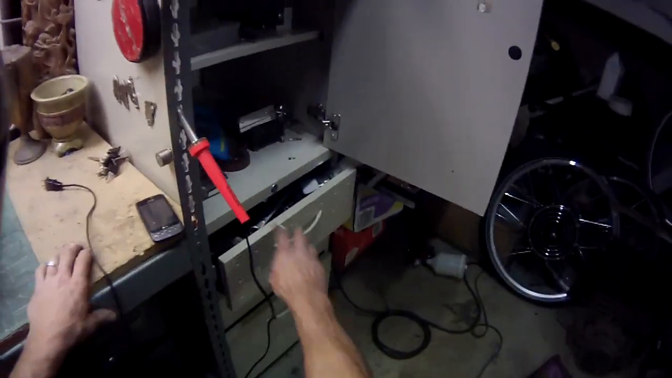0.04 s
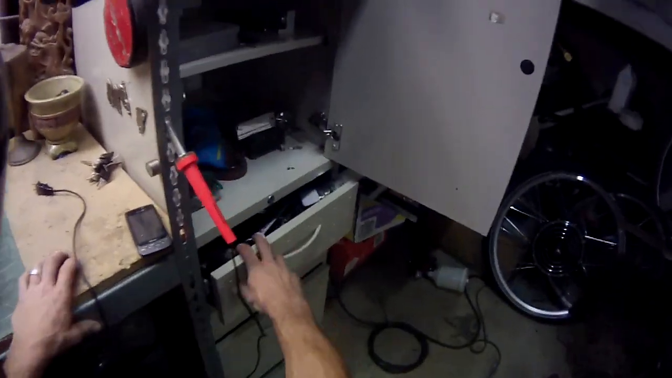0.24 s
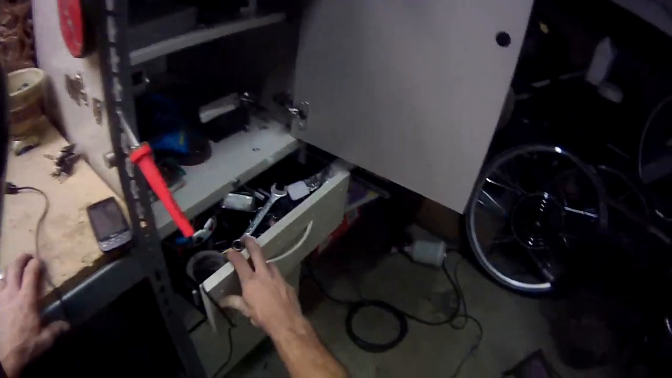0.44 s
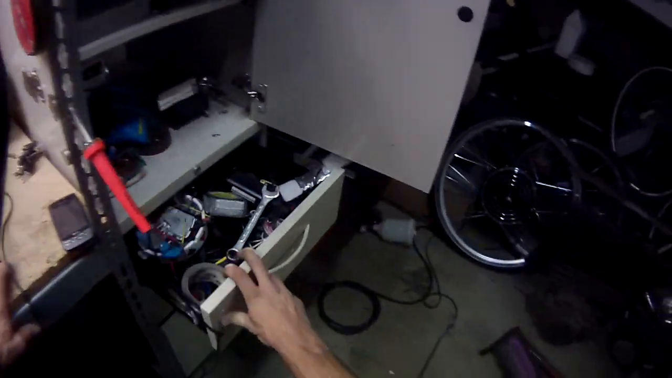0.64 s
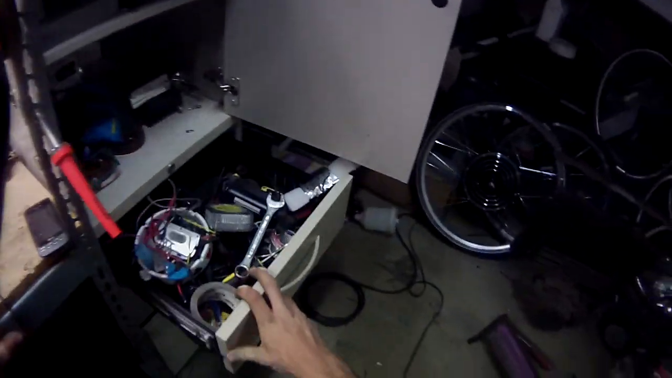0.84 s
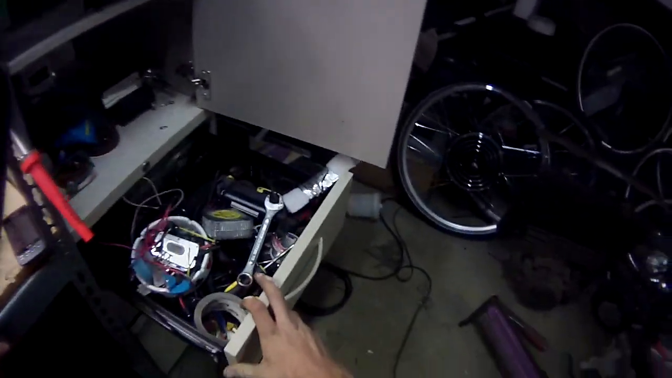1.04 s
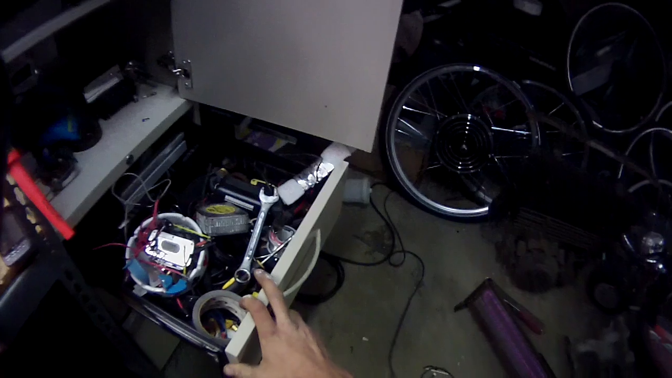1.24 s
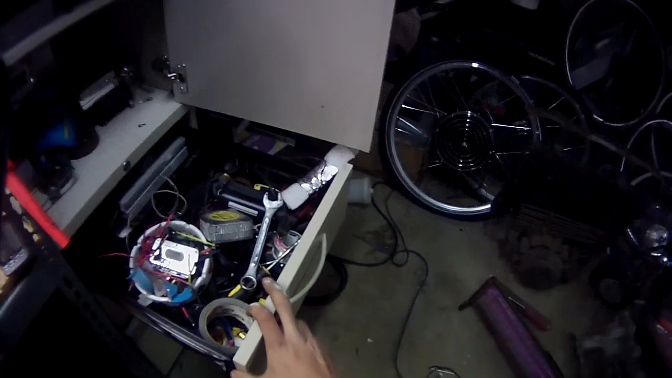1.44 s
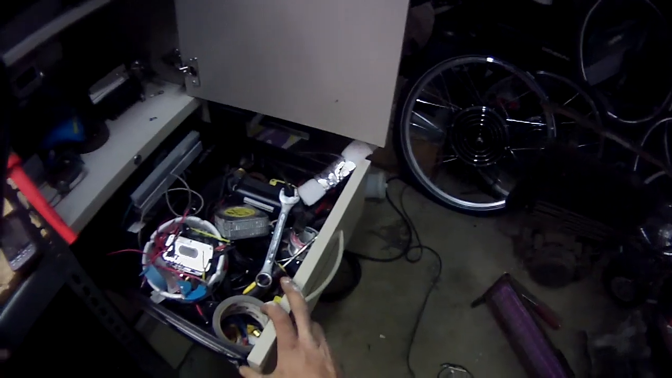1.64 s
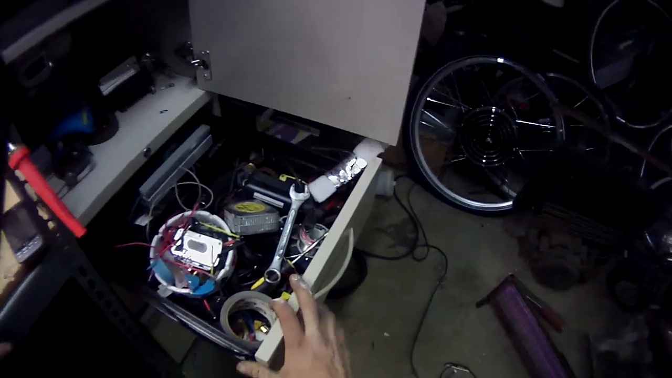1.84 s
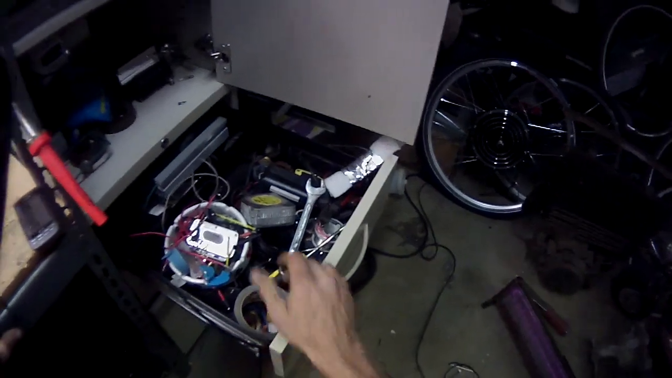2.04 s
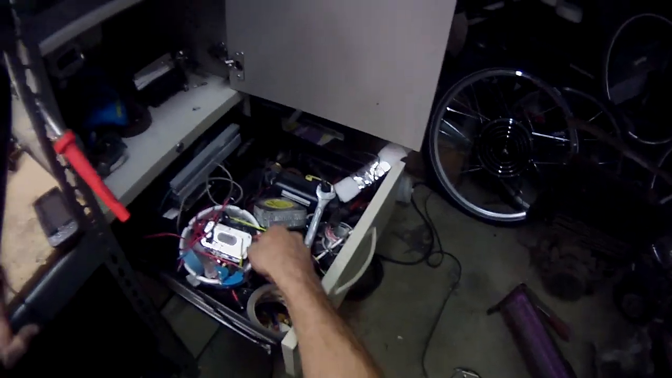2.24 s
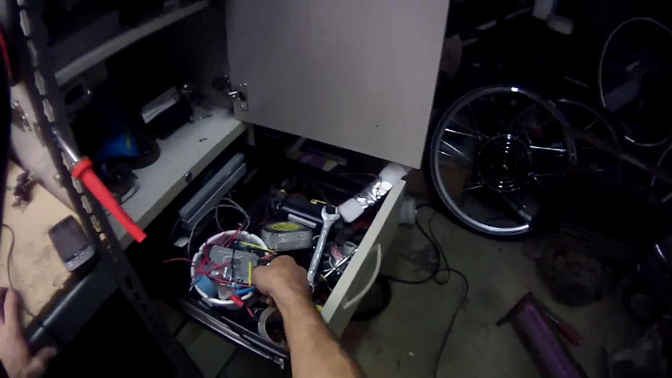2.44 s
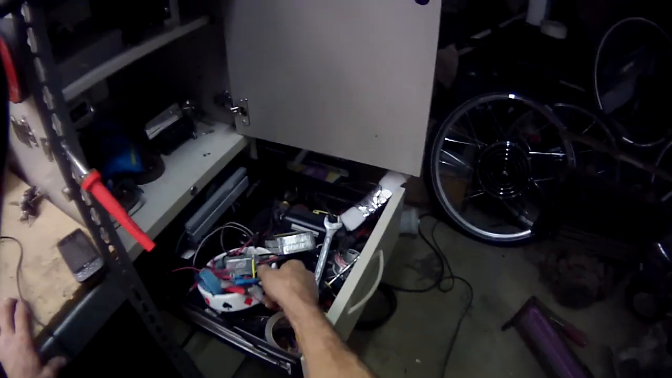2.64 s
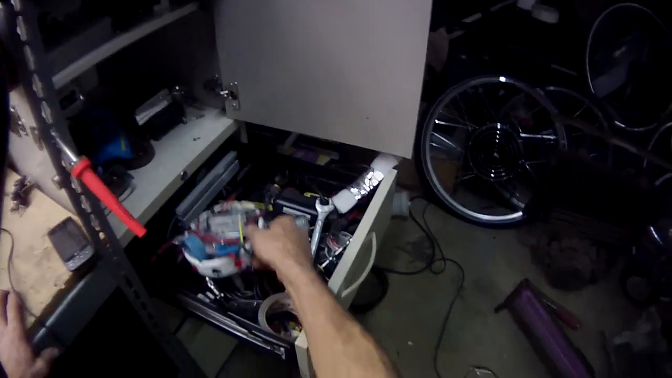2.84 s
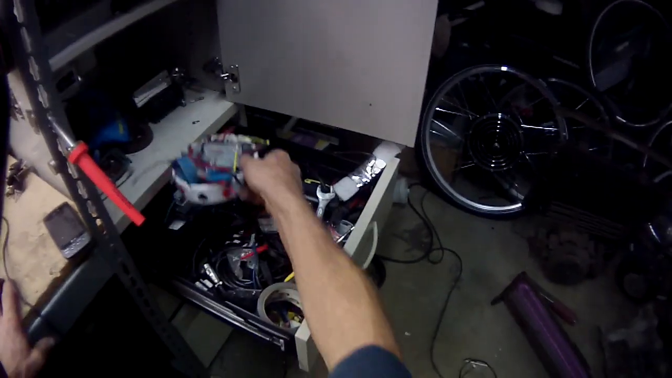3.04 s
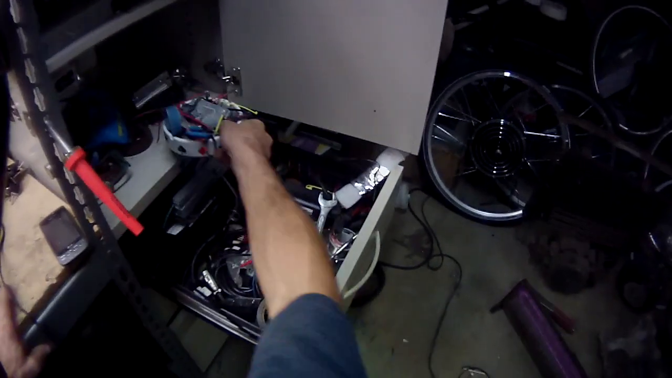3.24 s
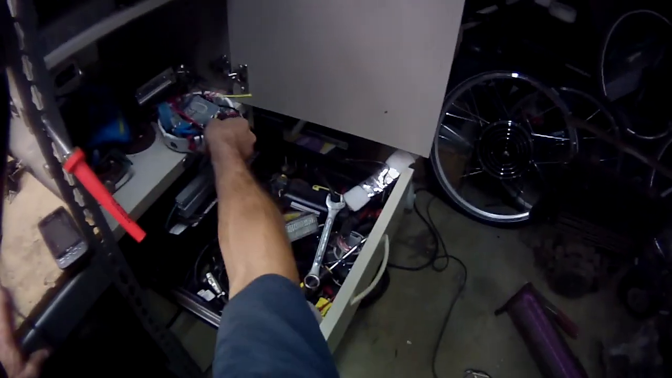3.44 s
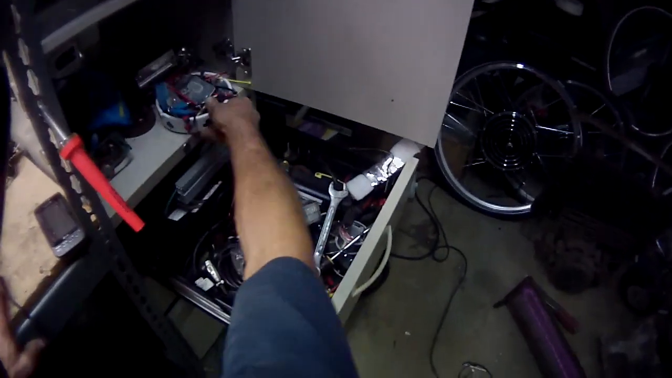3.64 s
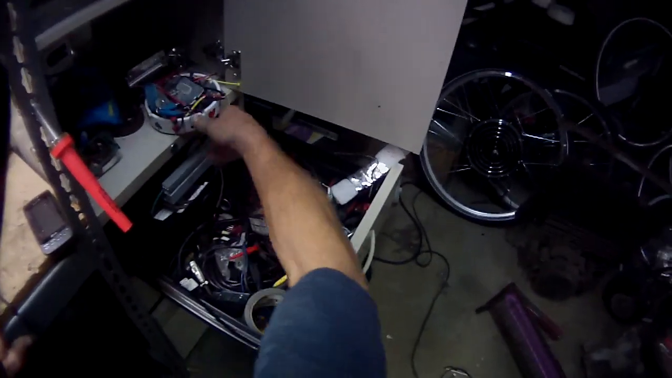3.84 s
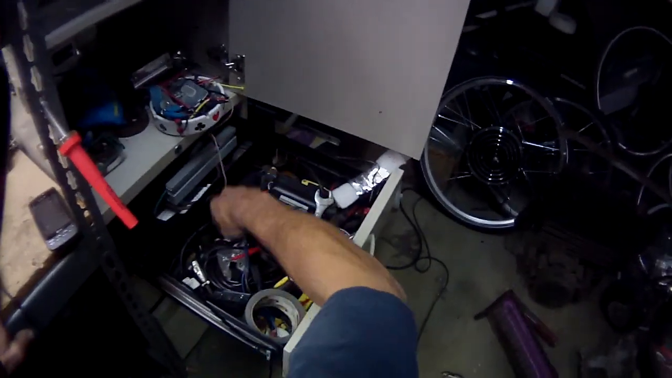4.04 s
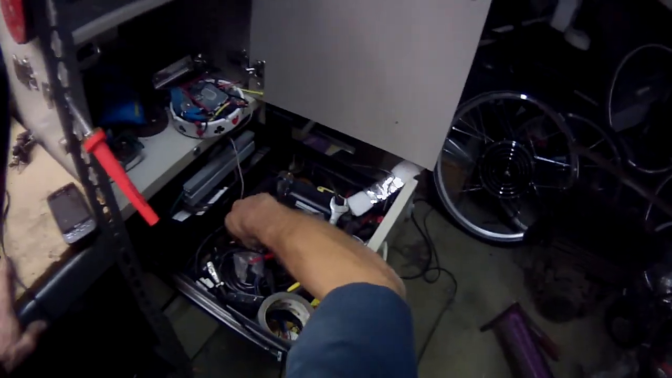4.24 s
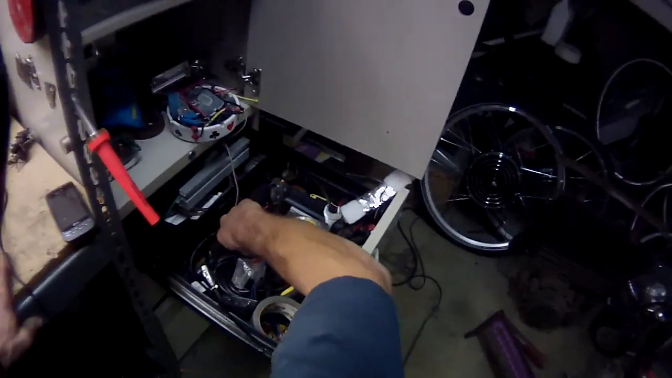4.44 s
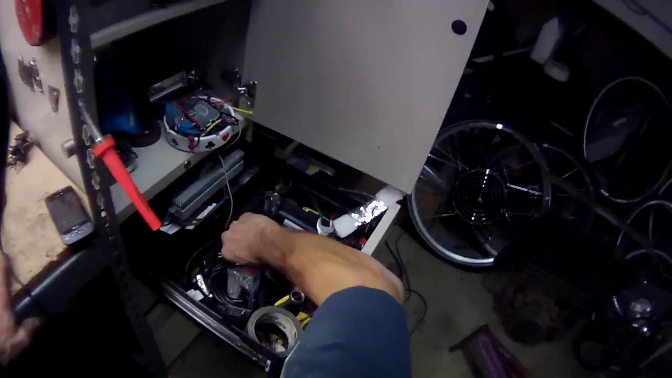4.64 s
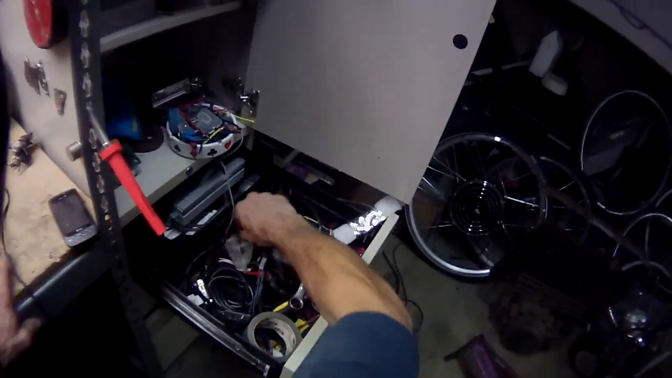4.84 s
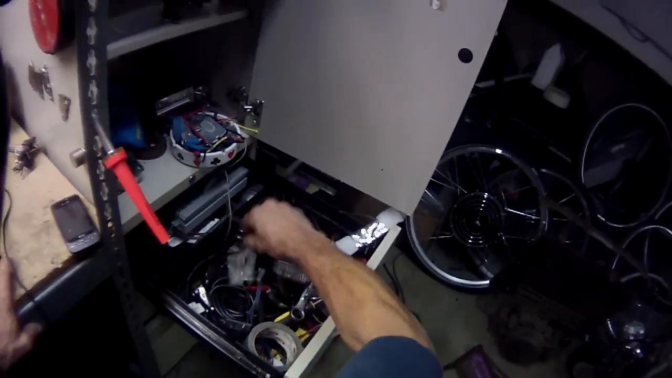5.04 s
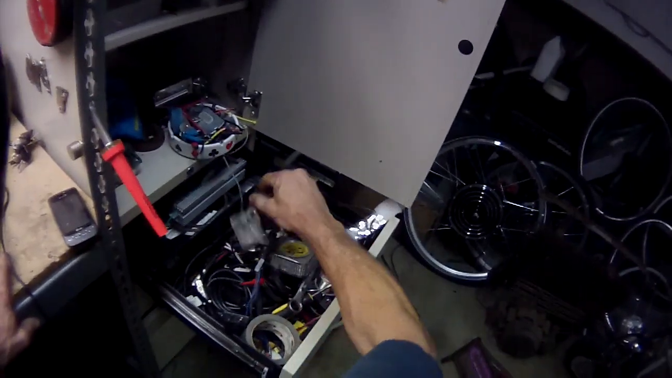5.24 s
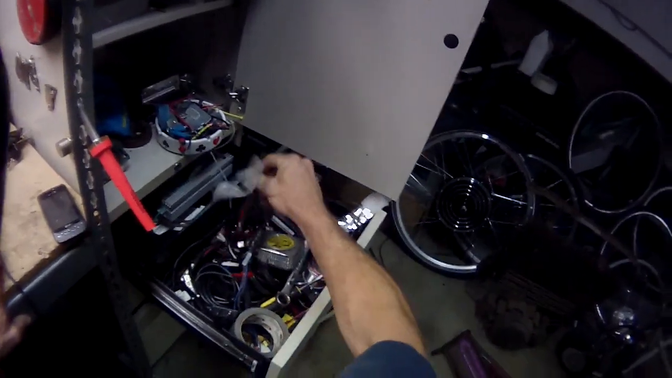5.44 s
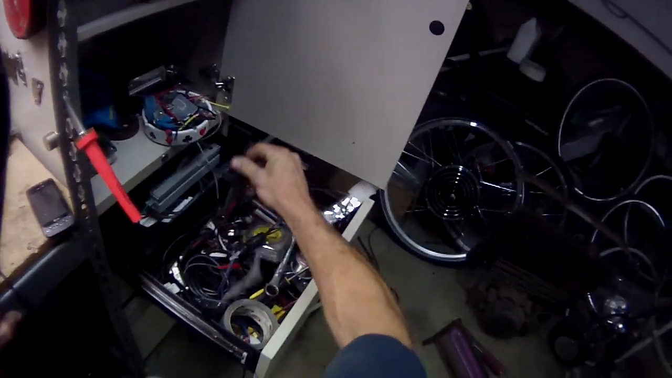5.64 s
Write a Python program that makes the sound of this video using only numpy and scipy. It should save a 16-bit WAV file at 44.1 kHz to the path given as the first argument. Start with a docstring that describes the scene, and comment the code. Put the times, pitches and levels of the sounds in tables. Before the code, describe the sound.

A wooden drawer scrapes open, then a hand rummages through tools and wires with light clinks, clatters, knocks and soft low thuds.

```python
"""A wooden drawer of tools and wires scrapes open in a small workshop; the tools bump, shift and clink.
A hand lifts out a round plastic-cased gadget, sets it on the shelf above, then digs among the wires again,
knocking loose parts together. Knocks and clinks are fading sine waves and noise; rubbing is many tiny puffs
of noise. Short room echoes surround them, over a low rumble and smooth hiss."""
import sys
import numpy as np
from scipy import signal
from scipy.fft import rfft, irfft
from scipy.io import wavfile
from scipy.ndimage import uniform_filter1d

SR = 44100
rng = np.random.default_rng(int(sys.argv[2]) if len(sys.argv) > 2 else 0)


def int16_out(signal):
    """Quantize to a 16-bit WAV file."""
    q = np.round(np.clip(np.atleast_2d(signal).T, -1, 1) * 32767)
    wavfile.write(sys.argv[1], SR, q.astype(np.int16))


N = 251370  # length of the scene in samples
RING_T = np.arange(SR // 2) / SR  # half a second of time since a contact, in seconds

# Tone of small parts touching. Each row: frequency in Hz, relative gain in dB.
CLINK_COLOUR = [(200, -20), (900, -21), (1300, -2.5), (2200, 5.5), (3200, 5), (4300, 7.5), (5800, 2.5),
                (6700, -10.5), (7800, -19), (15000, -70)]
# Tone of the drawer's wood. Each row: frequency in Hz, relative gain in dB.
WOOD_COLOUR = [(60, -25), (130, -0.5), (200, -4.5), (300, -2), (450, -1.5), (640, -2.5), (780, -16),
               (1200, -28), (4000, -50.5)]
# Bumps that knock the panels and set the contents clattering. Each row: start in seconds,
# level of the first knock in dB, pitch factor, clatter level in dB, settling time in seconds.
BUMPS = [(0.372, -34.5, 0.92, -39, 0.014), (0.648, -49, 0.95, -52.5, 0.014), (2.55, -56, 1.04, -64, 0.016),
         (2.598, -55, 0.96, -45, 0.019), (2.715, -53, 1.1, -47.5, 0.031), (2.808, -53, 1.12, -49.5, 0.0051),
         (3.398, -33.5, 0.94, -30, 0.017), (3.452, -38, 0.97, -35, 0.011), (3.551, -39.5, 1.09, -36, 0.016),
         (3.611, -58, 1.2, -48, 0.028), (4.3562, -42.5, 1.17, -48, 0.017), (5.159, -49, 1.1, -40.5, 0.026),
         (5.211, -51, 0.86, -38.5, 0.03), (5.2801, -25, 1.0, -25, 0.015), (5.524, -72, 0.76, -47.5, 0.01),
         (5.609, -47.5, 1.19, -57, 0.015)]
# A hard plastic part snapping down and bouncing. Each row: start in seconds, level of its ring in dB.
SNAPS = [(4.3564, -32), (4.3607, -31), (4.37, -46)]


def undb(db):
    """Turn decibels into a plain multiplying gain."""
    return 10 ** (np.asarray(db) / 20)


def level(x, db):
    """Set the average (rms) strength of a lasting sound."""
    return x * undb(db) / np.std(x)


def hit_level(x, db):
    """Set a blow's energy to that of a 10 ms sound at the given level."""
    energy = np.sum(x ** 2)
    return x * undb(db) / np.sqrt(energy / (SR * .01))


def add(out, s, x):
    """Mix x into out from time s on, cutting whatever runs past the end."""
    i = max(int(s * SR), 0)
    out[i:i + len(x)] += x[:max(len(out) - i, 0)]


def colour(x, points, size=8192):
    """Shape the tone through points of Hz and dB, with a filter that never sounds ahead of its input."""
    hz, db = np.transpose(points)
    bins_hz = np.arange(size // 2 + 1) * SR / size
    gain_db = np.interp(np.log(bins_hz + 1), np.log(hz), db)
    # folding the cepstrum to one side gives the quickest response with these gains
    cepstrum = irfft(np.log(undb(gain_db)))[:size // 2]
    cepstrum[1:] *= 2
    response = irfft(np.exp(rfft(cepstrum, size)))
    return signal.fftconvolve(x, response)[:len(x)]


def fade(t60):
    """Die away steadily, by 60 dB in t60 seconds."""
    return np.exp(-np.log(1000) * RING_T / max(t60, 1e-3))


def burst(t60):
    """Fading noise, standing for countless weak vibrations that die together."""
    return rng.standard_normal(len(RING_T)) * fade(t60)


def ring(modes, pitch=1):
    """Add fading sine waves from rows of Hz, dB and t60; every other one starts in the opposite direction."""
    total = 0
    for k, (hz, db, t60) in enumerate(modes):
        wave = np.sin(2 * np.pi * hz * pitch * RING_T)
        total = total + (-1) ** k * undb(db) * fade(t60) * wave
    return total


def grains(rate, uneven_db, t60, n):
    """Tiny random contacts of uneven size, each a fresh puff of noise; rate is contacts per second."""
    sizes = undb(uneven_db * np.minimum(rng.exponential(size=n), 3))
    contacts = sizes * (rng.random(n) < rate / SR)
    power = signal.fftconvolve(contacts ** 2, fade(t60) ** 2)[:n]
    return np.sqrt(np.abs(power)) * rng.standard_normal(n)


def walk(rate):
    """A smoothly drifting random value with a spread of 1, given rate new targets per second."""
    k = int(SR / rate)
    held = np.repeat(rng.standard_normal(N // k + 1), k)
    return level(uniform_filter1d(held, k)[:N], 0)


def own_peaks(count, patchy_db):
    """Give one part its own random peaks and hollows, as rows of Hz and dB."""
    return np.column_stack([np.geomspace(1200, 9000, count), patchy_db * rng.standard_normal(count)])


def clink(hz, t60, tick_db=-7, partials_db=-6, main_db=-9, bounce_db=-7, patchy_db=3, count=26):
    """One small part: a tick, a dense crack, a quick bounce, its main ring and many unrelated higher tones."""
    partials_hz = rng.uniform(1705, 6900, count)
    partials = zip(partials_hz, 3 * rng.standard_normal(count), t60 * (1 + rng.random(count)))
    crack = hit_level(burst(t60), 0) + hit_level(burst(0.0013), tick_db)
    bounce_s = rng.uniform(0.00207, 0.016)
    add(crack, bounce_s, hit_level(burst(0.1), bounce_db))
    tone = hit_level(ring(partials), partials_db)
    tone += hit_level(ring([(hz, 0, t60)]), main_db)
    return colour(colour(crack, own_peaks(count, patchy_db)) + tone, CLINK_COLOUR)


def tools(wood_t60=0.19, sparkle_sustain=1.25):
    """Each contact rings the part, sparkles on top and taps the wood that it lies on."""
    # Tools and small parts touching. Each row: start in seconds, level of the part in dB,
    # main ring in Hz, sparkle in dB relative to that level.
    contacts = [(0.366, -44, 3900, -28), (0.5517, -50.5, 1910, -32), (0.577, -47, 5800, -6.5),
                (0.7855, -54, 2390, -8.5), (0.8842, -43.5, 5340, -6.5), (0.936, -45, 3546, -7.5),
                (0.9635, -57, 3200, -5), (1.035, -53, 3380, -13), (1.0957, -54, 3940, -32),
                (1.19, -54, 2700, -34), (2.358, -50.5, 2820, -6), (2.409, -49, 4380, -13),
                (2.4273, -53, 5100, -3.5), (2.6589, -56.5, 4300, -6), (2.71, -48, 3830, -25),
                (2.772, -51.5, 3540, -12), (2.8052, -43.5, 4000, -12.5), (2.9093, -48, 4700, -8.5),
                (3.219, -41, 4240, -6), (3.3004, -52, 5400, -13), (3.3505, -49.5, 4600, -11),
                (3.4476, -38.5, 2500, -19), (3.5458, -38.5, 4370, -20), (4.1157, -46, 4280, -15),
                (4.2138, -47.5, 4010, -12.5), (4.2816, -49, 4000, -27), (4.583, -47.5, 4400, -19),
                (4.6218, -49.5, 3960, -9), (4.6511, -52, 4300, -27), (4.7567, -51, 4010, -13),
                (4.862, -58.5, 4000, -6), (4.9244, -52, 3700, -28), (5.031, -51.5, 4010, -17),
                (5.1083, -49, 2960, -19), (5.1278, -40.5, 2490, -12.5), (5.3562, -40, 3820, -18),
                (5.4934, -54.5, 5150, -7), (5.5418, -39, 4310, -18), (5.601, -38, 3950, -8.5),
                (5.667, -51, 3830, -6), (5.6924, -41, 4100, -11)]
    # Tone of the sparkle. Each row: frequency in Hz, relative gain in dB.
    sparkle_colour = [(3000, -73), (6000, 18.5), (7500, 7), (9300, 9), (11000, 1.5), (15000, -4)]
    # loose parts ring freely until the hand digs in among them and damps them
    free_t60_s, damped_t60_s, hand_in_s = 0.065, 0.048, 3.6
    # a middling part taps the wood this far below its own level; lower, heavier parts tap harder
    middling_hz, middling_tap_db, tap_db_per_octave = 4000, -11.5, 10
    out = np.zeros(N)
    for s, db, hz, bright_db in contacts:
        t60 = free_t60_s if s < hand_in_s else damped_t60_s
        sparkle = colour(burst(sparkle_sustain * t60), sparkle_colour)
        wood = colour(burst(wood_t60), WOOD_COLOUR)
        tap_db = middling_tap_db + tap_db_per_octave * np.log2(middling_hz / hz)
        add(out, s, hit_level(clink(hz, t60), db))
        add(out, s, hit_level(sparkle, db + bright_db))
        add(out, s, hit_level(wood, db + tap_db))
    return out


def knocks(count=3):
    """Hollow knocks on the drawer's panels, each rebounding ever weaker and a little higher."""
    # The drawer's panels. Each row: frequency in Hz before the pitch factor, relative level in dB,
    # time to fade by 60 dB in seconds.
    panel_modes = [(118, -19, .15), (230, -12, .08), (283, -11, .07), (344, -4, .09), (446, 0, .09),
                   (520, -6, .07), (653, -4, .09)]
    rebound_s, rebound_db, rebound_rise = 0.0112, -5, 0.076  # rise is a fraction of the first pitch
    out = np.zeros(N)
    for s, db, pitch, _, _ in BUMPS:
        for k in range(count):
            knock = ring(panel_modes, pitch * (1 + k * rebound_rise))
            add(out, s + k * rebound_s, hit_level(knock, db + k * rebound_db))
    return out


def clatters(contacts_per_s=1100, uneven_db=4, contact_t60=0.064, lag_s=0.005):
    """Just after a bump many edges of the contents strike close together, ever more weakly."""
    # Tone of the clatter. Each row: frequency in Hz, relative gain in dB.
    clatter_colour = [(300, -0.5), (600, 10), (800, -6.5), (1050, -4.5), (1350, -4), (2400, 1.5),
                      (3300, -3), (4400, -0.5), (5800, -4), (7300, -20.5), (9300, -21.5), (15000, -29)]
    out = np.zeros(N)
    for s, _, _, db, settle_s in BUMPS:
        run = grains(contacts_per_s, uneven_db, contact_t60, len(RING_T))
        run = run * np.exp(-RING_T / settle_s)
        add(out, s + lag_s, hit_level(colour(run, clatter_colour), db))
    return out


def clanks():
    """A loose metal part clanks against the tools, ringing in many close tones."""
    # Each row: start in seconds, level in dB.
    strikes = [(5.289, -35), (5.2932, -37)]
    # Ring of the metal. Each row: frequency in Hz, relative level in dB, time to fade by 60 dB in seconds.
    metal_modes = [(1280, 0, 0.055), (2040, 0, 0.065), (2370, -5, 0.059), (2600, 3, 0.075),
                   (3040, 3, 0.074), (2990, -10, 0.11), (3880, -1, 0.12), (3920, -7, .09),
                   (4130, -1, 0.065), (4450, 1, 0.077)]
    out = np.zeros(N)
    for s, db in strikes:
        add(out, s, hit_level(ring(metal_modes), db))
    return out


def snap_rings():
    """The hard plastic part rings in its own tones as it snaps down."""
    # Ring of the plastic. Each row: frequency in Hz, relative level in dB, time to fade by 60 dB in seconds.
    snap_modes = [(535, -1, 0.04), (600, -27, 0.068), (795, -15, 0.072), (1620, -14, .045),
                  (1820, -1, 0.041), (2020, 2, 0.054), (2234, 8.5, 0.037), (2480, 8.5, 0.018),
                  (2570, -14, 0.037), (3050, -19, .05), (3475, -15, 0.038), (3980, -17, 0.055),
                  (5500, -21, 0.051), (6270, -17, 0.054)]
    out = np.zeros(N)
    for s, db in SNAPS:
        add(out, s, hit_level(ring(snap_modes), db))
    return out


def snap_cracks(crack_db=-2, t60=0.055, tail_db=-12, tail_t60=0.33):
    """The dense part of the plastic snap: a short crack and the shiver of whatever lies around it."""
    # Tone of the crack. Each row: frequency in Hz, relative gain in dB.
    snap_colour = [(150, -20), (520, 4), (820, 3), (1250, -10.5), (2200, 4), (2900, -4), (4000, -1),
                   (5700, -7), (7500, -21), (15000, -40)]
    out = np.zeros(N)
    for s, db in SNAPS:
        crack = hit_level(burst(t60), 0) + hit_level(burst(tail_t60), tail_db)
        add(out, s, hit_level(colour(crack, snap_colour), db + crack_db))
    return out


def thuds(rise_s=0.032):
    """The cabinet takes a few cycles to swing up under a soft heavy load, then hums on faintly."""
    # The gadget's weight landing on the shelf, or the drawer bumping its cabinet.
    # Each row: start in seconds, level in dB.
    landings = [(0.562, -42), (3.401, -33), (3.474, -29.5), (3.553, -26)]
    # Ring of shelf and cabinet. Each row: frequency in Hz, relative level in dB,
    # time to fade by 60 dB in seconds.
    shelf_modes = [(118.5, 14.5, 0.082), (110.6, -30.5, 1), (136, -9.5, 0.17), (180, -25, 0.13),
                   (313, -19.5, 0.21)]
    swing_up = (1 - np.exp(-RING_T / rise_s)) ** 2
    out = np.zeros(N)
    for s, db in landings:
        add(out, s, hit_level(ring(shelf_modes) * swing_up, db))
    return out


def stirring(t):
    """Strength in dB of scratch and rumble at time t, over the three movements of the hand."""
    # Drawer pulled, gadget lifted out, wires dug through. Each row: time in seconds,
    # scratch in dB, rumble of the wood in dB, both before the trims of the sounds that follow them.
    pull = [(0.0, -73, -64), (0.16, -66.5, -59), (0.356, -63, -56), (0.548, -57, -49.5), (0.85, -61, -54),
            (1.038, -66, -57.5), (1.22, -70, -63.5), (1.6, -74.5, -69)]
    lift = [(2.25, -77, -69.5), (2.374, -70, -65.5), (2.582, -59, -64), (3.246, -70.5, -66),
            (3.432, -52.5, -58), (3.51, -54.5, -46.5), (3.64, -71, -59), (3.8, -73, -64)]
    dig = [(4.05, -75, -62.5), (4.154, -73, -61.5), (4.334, -63, -62), (4.9, -60.5, -60), (5.13, -62, -57),
           (5.248, -53.5, -55.5), (5.562, -55.5, -63.5), (5.7, -52.5, -62)]
    s, scratch, rumble = np.concatenate([pull, lift, dig]).T
    return np.interp(t, s, scratch), np.interp(t, s, rumble)


def rubbing(slips_per_s=500, uneven_db=0.5, slip_t60=0.052, scratch_db=-4, rumble_db=-1):
    """Dense uneven slips scratch the contents and make the drawer's wood rumble; slides hiss more smoothly."""
    # Tone of rubbing. Each row: frequency in Hz, relative gain in dB.
    rub_colour = [(300, -64), (1000, -3.5), (2200, 7), (3200, 3.5), (4300, 3), (5700, -1), (7500, -12),
                  (15000, -22)]
    # Short slides of the drawer, of fingers over its edge, of wires.
    # Each row: middle in seconds, length in seconds, level in dB.
    slides = [(0.18, 0.068, -63), (0.256, .16, -71), (0.65, 0.098, -58.5), (1.914, 0.17, -65.5),
              (2.051, 0.11, -74), (4.298, 0.06, -57.5)]
    scratch, rumble = stirring(np.arange(N) / SR)
    slips = grains(slips_per_s, uneven_db, slip_t60, N)
    out = level(colour(slips, rub_colour), scratch_db) * undb(scratch)
    out += level(colour(slips, WOOD_COLOUR), rumble_db) * undb(rumble)
    for middle, length, db in slides:
        n = int(length * SR)
        hiss = colour(rng.standard_normal(n), rub_colour) * np.hanning(n) ** .5
        add(out, middle - length / 2, level(hiss, db))
    return out


def wires(tick_db=-2, uneven_db=2.5, t60=0.029, patchy_db=5, count=150, size=12):
    """Wire ends flick their neighbours, each with its own tone, harder when the contents are stirred more."""
    out = np.zeros(N)
    for s in rng.uniform(0, N / SR, count):
        scratch, _ = stirring(s)
        flick = colour(burst(t60)[:SR // 16], own_peaks(size, patchy_db))
        flick = colour(flick, CLINK_COLOUR)
        force_db = uneven_db * np.clip(rng.standard_normal(), -2, 2)
        add(out, s, hit_level(flick, scratch + tick_db + force_db))
    return out


def squeaks(slips_per_s=160, scatter=0.023, uneven_db=4, slip_t60=0.025):
    """Each squeak is a halting string of slips, every slip a tiny ping scattered around one pitch."""
    # Soft whines of rubbing plastic as the gadget is gripped and dragged free.
    # Each row: start in seconds, length in seconds, central pitch in Hz, level in dB.
    whines = [(2.388, 0.035, 5280, -50.5), (2.399, 0.2, 6480, -55), (2.499, 0.016, 5570, -61)]
    out = np.zeros(N)
    for s, length_s, hz, db in whines:
        string = np.zeros(len(RING_T))
        slips = rng.standard_normal((int(length_s * slips_per_s) + 1, 3))
        for k, (delay, detune, force) in enumerate(slips):
            ping = ring([(hz, uneven_db * force, slip_t60)], 1 + scatter * detune)
            add(string, (k + delay / 2) / slips_per_s, ping)
        add(out, s, hit_level(string, db))
    return out


def workshop(x, wet_db=-12, t60=0.2, build_s=0.0061, boom_db=-10, boom_t60=0.7):
    """A small cluttered room: a short blurred echo added to the sound, with the bass lingering longest."""
    build_up = (1 - np.exp(-RING_T / build_s)) ** 2
    room_colour = [(100, 12.5), (500, 4.5), (1500, 2.5), (5000, 1), (12000, -1.5)]  # Hz, relative dB
    tail = colour(burst(t60) * build_up, room_colour)
    low_pass = signal.butter(2, 250, fs=SR, output="sos")
    tail += undb(boom_db) * signal.sosfilt(low_pass, burst(boom_t60))
    tail = tail / np.sqrt(np.sum(tail ** 2))
    return x + undb(wet_db) * signal.fftconvolve(x, tail)[:N]


def background(air_db=-56, waver_db=-2.15):
    """Filtered noise gives a low rumble under smooth hiss; only the lows waver gently."""
    # Tone of the background. Each row: frequency in Hz, relative gain in dB.
    air_colour = [(12, -37.5), (20, -7.5), (59, -4), (87, -10.5), (135, -13.5), (235, -25), (256, -27.5),
                  (387, -25.5), (587, -31), (2040, -42), (2220, -44), (3650, -46), (3970, -46), (5090, -46),
                  (15000, -47.5)]
    air = level(colour(rng.standard_normal(N), air_colour), air_db)
    low = signal.sosfilt(signal.butter(1, 300, fs=SR, output="sos"), air)
    return air + low * (undb(waver_db * walk(6.7)) - 1)


def scene():
    """The contents sound into the room; close blows get a little less echo and the low thuds none."""
    contents = tools() + clatters() + snap_cracks() + rubbing() + wires() + squeaks()
    blows = knocks() + clanks() + snap_rings()
    mix = workshop(contents) + workshop(blows, wet_db=-14.0) + thuds() + background()
    return mix[None]  # one channel


def record(dry):
    """Cut the extreme treble steeply with a low-pass filter."""
    top_hz = 15450
    return signal.sosfilt(signal.ellip(10, .2, 70, top_hz, fs=SR, output="sos"), dry)


dry = scene()
out = record(dry)
int16_out(out)
```